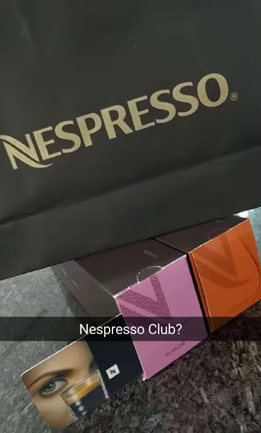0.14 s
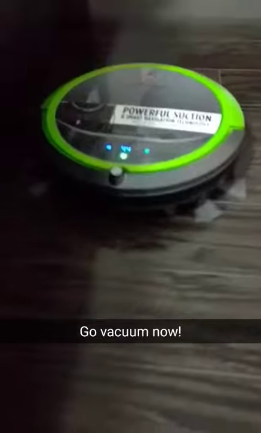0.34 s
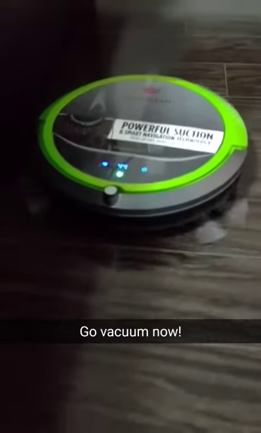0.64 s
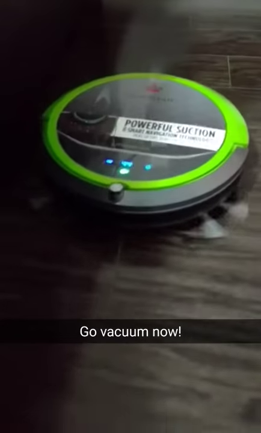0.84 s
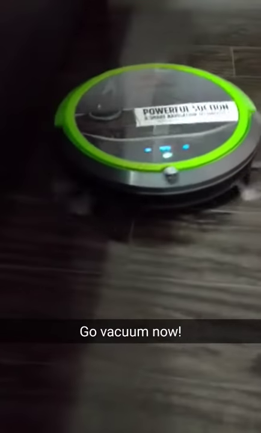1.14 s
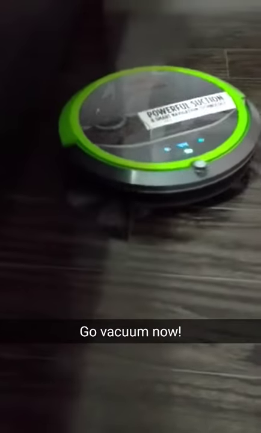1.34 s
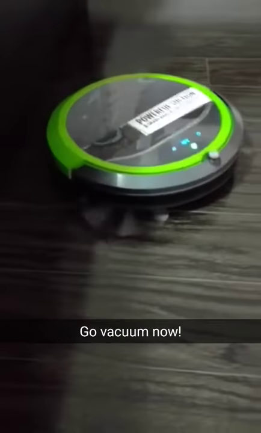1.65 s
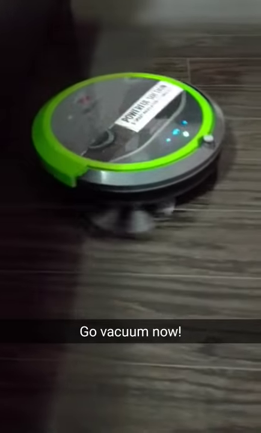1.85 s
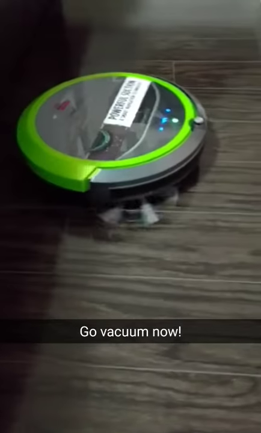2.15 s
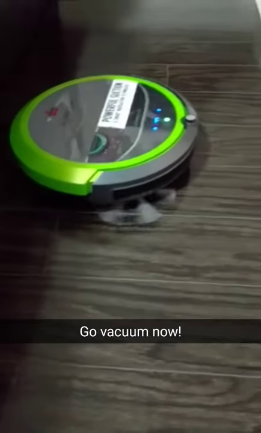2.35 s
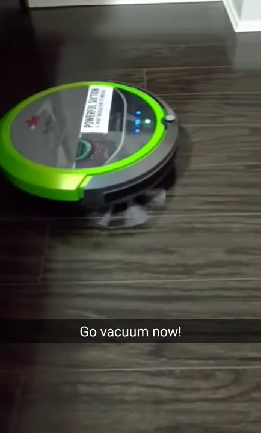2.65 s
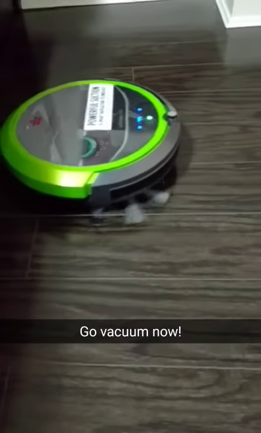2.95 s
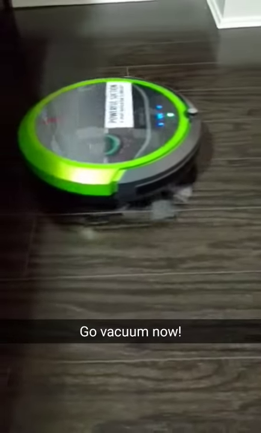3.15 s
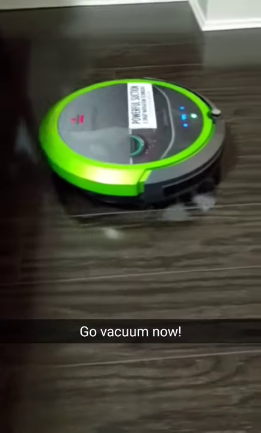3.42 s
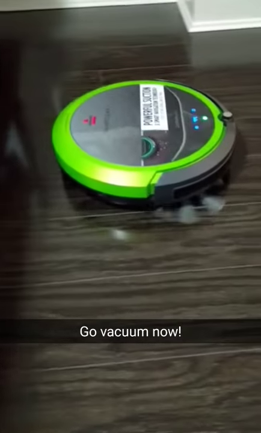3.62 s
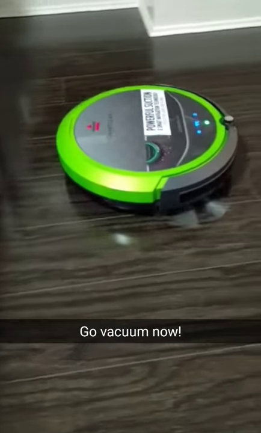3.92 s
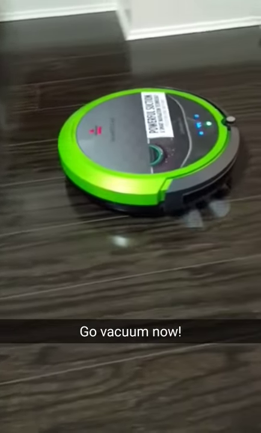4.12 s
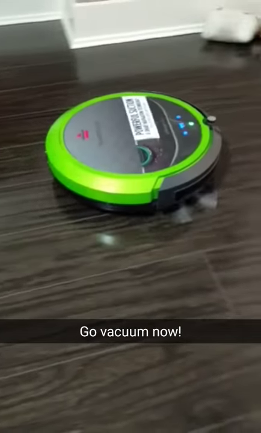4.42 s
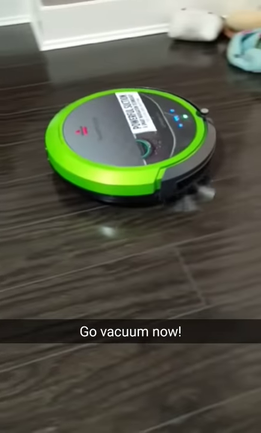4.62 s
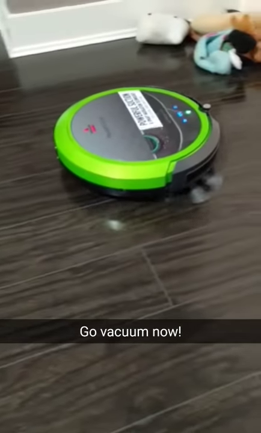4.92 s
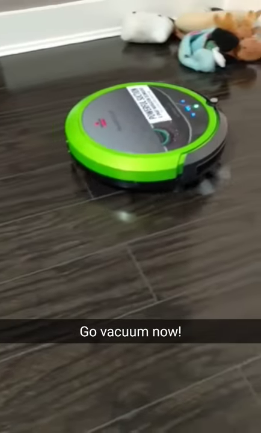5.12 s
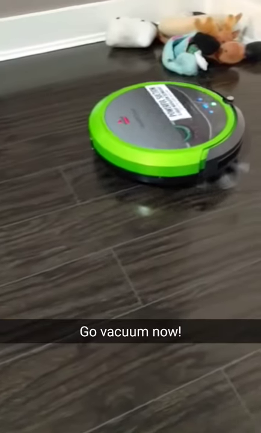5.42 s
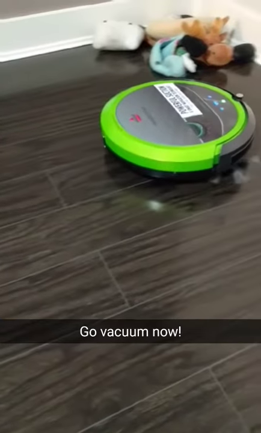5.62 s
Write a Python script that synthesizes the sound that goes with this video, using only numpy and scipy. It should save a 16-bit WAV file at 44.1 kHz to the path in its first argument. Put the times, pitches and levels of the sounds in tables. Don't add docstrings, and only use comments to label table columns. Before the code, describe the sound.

A robot cleaner turns on the spot and then drives across a wooden floor indoors. After a silent start, constant rushing air dominates, with wavering motor whine, brush-drive hum and airy whistling underneath, plus fine bristle flicks. Later, gentle rumbling and a low motor hum join as it moves off, only slightly quieter. Nearly mono phone pickup, with coarse, swirly treble.

```python
import sys
import numpy as np
from scipy import signal
from scipy.fft import rfft, irfft, dct
from scipy.io import wavfile
from scipy.ndimage import uniform_filter1d

SR = 44100
rng = np.random.default_rng(int(sys.argv[2]) if len(sys.argv) > 2 else 0)


def elevation(decibels):
    levels = np.asarray(decibels, float)
    return 10 ** (levels / 20)


def persist_wave(psi):
    counts = np.round(np.clip(psi, -1, 1) * 32767).astype(np.int16)
    wavfile.write(sys.argv[1], SR, np.atleast_2d(counts).T)


N = 254456
ROLLS_S, WHEELS_S = 3.1, 3.65
TOP_HZ = 14000


def rms_one(x):
    return x / np.sqrt(np.mean(x ** 2) + 1e-20)


def in_time(rows):
    s, *columns = np.transpose(rows)
    return [np.interp(np.arange(N) / SR, s, c) for c in columns]


def at_hz(points, hz):
    point_hz, value = np.transpose(points)
    return np.interp(np.log(hz), np.log(point_hz), value)


def drift(rate):
    r = np.exp(-80 * np.pi * rate / SR)
    slow = signal.lfilter([1], [1, -2 * r, r * r], rng.standard_normal(N // 40 + 2002))[2000:]
    return np.interp(np.arange(N) / 40, np.arange(len(slow)), rms_one(slow))


def band(x, low_hz, high_hz):
    return signal.sosfilt(signal.butter(2, [low_hz, high_hz], "band", fs=SR, output="sos"), x)


def coloured(colour):
    hz = np.arange(N // 2 + 1) * SR / N + 1
    return rms_one(irfft(rfft(rng.standard_normal(N)) * elevation(at_hz(colour, hz)), N))


def ramp(start_s, length_s):
    return np.clip((np.arange(N) / SR - start_s) / length_s, 0, 1)


def swell(rest_db, rows):
    t = np.arange(N // 64 + 2) * 64 / SR
    gain = elevation(rest_db)
    for s, length, db in rows:
        fall_db = 6 * (2 * (t - s) / length) ** 2
        gain = gain + elevation(db - np.minimum(fall_db, 90))
    return np.interp(np.arange(N) / SR, t, 20 * np.log10(gain))


def swells(rests_db, tables):
    return [swell(db, rows) for db, rows in zip(rests_db, tables)]


def turns(hz, wobble_hz):
    return 2 * np.pi * np.cumsum(hz + wobble_hz * drift(5.1)) / SR


def lines(phase, orders, levels_db, flutter_db):
    out = 0
    for k, db in zip(orders, levels_db):
        gain = np.sqrt(2) * elevation(db + flutter_db * drift(9.3))
        out = out + gain * np.sin(k * phase + rng.uniform(0, 2 * np.pi))
    return out


def whistle(hz, level_db, width_hz):
    phase = 2 * np.pi * np.cumsum(hz) / SR
    return elevation(level_db) * (drift(width_hz) * np.cos(phase) + drift(width_hz) * np.sin(phase))


# f/Hz, level/dB per Hz
ROOM_TONE = [(12, -22), (20, -8), (30, -12), (75, -8), (105, -11), (130, -4), (170, -36), (300, -90)]


def room_tone():
    return elevation(-64.5) * coloured(ROOM_TONE)


# t/s, level/dB
AIR = [
    (.4, -28),
    (.87, -26),
    (1.15, -27),
    (2.4, -28),
    (3.3, -27.5),
    (4.5, -28),
    (5.77, -28.5),
]
# f/Hz, level/dB per Hz
AIR_COLOUR = [(100, -45), (170, -16), (241, -14.5), (461, -4.5), (787, -2.5), (879, -2.5), (1560, -1.5),
              (1740, -2), (2710, -1.5), (3200, -1), (3990, -3.5), (4890, -2.5), (13000, -4), (14000, -5.5)]
# f/Hz, width/Hz, level/dB
SHELL = [(476, 21, 3), (883, 75, 2), (950, 35, -1.5), (2190, 85, 0.5), (2786, 150, -1), (4070, 330, -1),
         (274, 28, 1), (366, 27, 1), (3160, 140, 0.5), (5850, 670, 1), (9800, 650, 2.5), (13200, 830, 3.5)]


def air(gear_phase):
    level_db, = in_time(AIR)
    facing_db = ramp(ROLLS_S, 0.43) - .5
    rolling = ramp(4.0, 1.2)
    edges = 160 * 2 ** (np.arange(41) / 6)
    white, gust = rng.standard_normal((2, N)), drift(8.3)
    near, out = drift(12), 0
    throb = np.sin(gear_phase / 10) + 0.45 * np.sin(gear_phase / 5)
    for k, (low, high) in enumerate(zip(edges, edges[1:])):
        hz = np.sqrt(low * high)
        near = 0.69 * near + 0.77 * drift(18.0)
        db = at_hz(AIR_COLOUR, hz) + facing_db * (1200 < hz < 3000)
        db = db - 2.3 * rolling * (hz < 330)
        db = db + .4 * gust + .7 * near + .9 * drift(25)
        db = db + at_hz([(2000, 0.057), (12000, 0.74)], hz) * throb
        out = out + elevation(db) * band(white[k % 2], low, high)
    hz = np.arange(N // 2 + 1) * SR / N
    shape = sum(db / (1 + (2 * (hz - centre) / width) ** 2) for centre, width, db in SHELL)
    out = irfft(rfft(out) * elevation(shape), N)
    return elevation(level_db) * out / np.std(band(out, 3000, 8000))


def dust_bin():
    cavity_db = in_time(AIR)[0] - 23 - 8 * ramp(WHEELS_S, 0.25)
    cavity = whistle(468 + 4 * drift(0.93), cavity_db, width_hz=10)
    outlet = whistle(np.full(N, 555.), swell(-66.5, [(1.1, .8, -46)]), width_hz=20)
    return cavity + outlet


GEAR_ORDERS = (1, 2, 3, 4, 5, 6, 8)
GEAR_REST_DB = [-69, -64, -55, -56, -62.5, -61.5, -68]
# t/s (centre), length/s, level/dB (peak)
GEAR_SWELLS = [
    [(3.3, 1.0, -58), (5.0, 1.2, -53)],
    [(.75, 0.64, -47.5), (1.8, 1.9, -48), (3.95, 0.48, -46.5), (5.25, 1.1, -45)],
    [(.78, 0.4, -45), (2.5, 0.17, -47.5), (3.25, 1.0, -42), (4.95, 0.67, -46)],
    [(1.4, 0.54, -42.5), (2.5, 1.4, -45), (3.8, 0.51, -48.5), (5.35, 0.29, -52)],
    [(2.05, .5, -41), (3.8, 0.87, -45), (5.35, .4, -40.5)],
    [(.8, .2, -46), (3.5, 0.2, -44), (4.3, 0.76, -47), (5.2, 0.28, -50)],
    [(1.75, 0.43, -42), (3.3, 0.97, -54), (5.4, .5, -48)],
]


def brush_gears(gear_phase):
    return lines(gear_phase, GEAR_ORDERS, swells(GEAR_REST_DB, GEAR_SWELLS), flutter_db=1.3)


BRUSH_ORDERS = (2, 3, 4, 18)
BRUSH_REST_DB = [-70, -69.5, -63.5, -61]
# t/s (centre), length/s, level/dB (peak)
BRUSH_SWELLS = [
    [(1.0, 1.12, -52.5), (2.6, 1.6, -50), (4.05, 0.29, -52)],
    [(1.0, 0.26, -58), (1.85, 0.16, -57.5), (3.2, 1.45, -58.5), (4.5, 0.67, -62)],
    [(4.5, 0.55, -61)],
    [(.8, 0.61, -42), (2.7, 0.97, -48.5), (4.35, 0.46, -44), (5.0, .3, -52)],
]


def brush_shaft(gear_phase):
    return lines(gear_phase / 5, BRUSH_ORDERS, swells(BRUSH_REST_DB, BRUSH_SWELLS), flutter_db=.4)


# t/s, f/Hz
FAN = [
    (.4, 856),
    (1.0, 857.5),
    (2.9, 857.5),
    (3.2, 854.3),
    (5.77, 854.0),
]
FAN_ORDERS = (1, 2, 3, 9 / 4)
FAN_REST_DB = [-70.5, -51.5, -57, -60]
# t/s (centre), length/s, level/dB (peak)
FAN_SWELLS = [
    [(.75, 0.23, -59), (1.6, 0.82, -48.5)],
    [(1.03, 0.67, -40), (1.55, .16, -43.5), (2.12, 0.26, -42), (3.55, 0.67, -39), (4.0, .3, -43.5),
     (4.72, .4, -34), (5.08, 0.41, -45), (5.75, 0.22, -45)],
    [(.9, 0.5, -48), (1.55, 0.35, -41), (2.8, .4, -54), (3.9, .3, -53), (5.3, 0.6, -40.5)],
    [(1.3, 1.09, -56), (3.4, 0.27, -44), (4.1, 0.37, -52), (5.0, .9, -50)],
]


def suction_fan():
    blade_hz, = in_time(FAN)
    levels_db = swells(FAN_REST_DB, FAN_SWELLS)
    blades = lines(turns(blade_hz, wobble_hz=.8), FAN_ORDERS, levels_db, flutter_db=1.0)
    wake = whistle(2 * blade_hz, levels_db[1] - 7, width_hz=25)
    return blades + wake


# t/s, f/Hz (low whistle), f/Hz (high whistle)
WHISTLES = [
    (.4, 874, 2294),
    (1.9, 856, 2210),
    (2.2, 926, 2180),
    (3.2, 958, 2090),
    (3.6, 940, 2150),
    (3.95, 923, 2180),
    (4.2, 946, 2087),
    (4.75, 976, 2145),
    (5.77, 976, 2174),
]
WHISTLE_REST_DB = [-53.5, -55.5]
# t/s (centre), length/s, level/dB (peak)
WHISTLE_SWELLS = [
    [(1.25, 0.62, -44), (2.3, 0.33, -44), (2.9, 0.57, -42), (4.1, 0.54, -40.5), (4.7, 0.37, -42.5),
     (5.6, 0.51, -48)],
    [(.9, 0.95, -51), (3.3, 0.21, -39.5), (4.05, 0.38, -37), (4.75, .3, -41), (5.7, .2, -38)],
]


def gap_whistles():
    low_hz, high_hz = in_time(WHISTLES)
    low_db, high_db = swells(WHISTLE_REST_DB, WHISTLE_SWELLS)
    return whistle(low_hz, low_db, width_hz=35) + whistle(high_hz, high_db, width_hz=70)


# t/s (centre), length/s, level/dB (peak)
BRISTLE_SWELLS = [
    (.86, .2, -47),
]


def bristles():
    sizes = elevation(4.5 * np.minimum(rng.exponential(1, N), 3)) * rng.choice([-1, 1], N)
    ticks = sizes * (rng.random(N) < 250 * elevation(3.0 * drift(8)) / SR)
    ring = signal.lfilter([1], [1, -np.exp(-1 / (0.0009 * SR))], np.abs(ticks))
    tail = ring * rng.standard_normal(N)
    level_db = swell(-37.5, BRISTLE_SWELLS)
    return elevation(level_db) * rms_one(band(ticks + 0.45 * tail, 1460, 8300))


# f/Hz, level/dB per Hz
RUMBLE_COLOUR = [(13, -50), (22, -28), (73, -4.5), (92, -1), (113, -18), (130, 5), (170, -20), (290, -120)]
# t/s (centre), length/s, level/dB (peak)
RUMBLE_BUMPS = [
    (.64, 0.17, -50),
    (3.75, 0.25, -58),
    (4.7, 0.32, -53),
    (4.98, .1, -55),
    (5.5, 0.61, -57),
]


def floor_rumble():
    standing = elevation(swell(-69, RUMBLE_BUMPS))
    rolling = elevation(-59) * ramp(ROLLS_S, .12)
    return (standing + rolling) * elevation(.8 * drift(6.1)) * coloured(RUMBLE_COLOUR)


def drumming_boards():
    return ramp(ROLLS_S, .12) * whistle(np.full(N, 86.), -61.5, width_hz=14)


# t/s, f/Hz
WHEELS = [
    (3.7, 146),
    (4.08, 153),
    (4.4, 161.3),
    (4.8, 160),
    (5.08, 145.9),
    (5.5, 150),
    (5.77, 151.3),
]
WHEEL_REST_DB = [-56, -59]
# t/s (centre), length/s, level/dB (peak)
WHEEL_SWELLS = [
    [(4.53, 0.91, -50)],
    [(5.22, 0.18, -47), (5.5, .25, -42)],
]


def wheel_motor():
    phase = turns(in_time(WHEELS)[0], wobble_hz=1.0)
    hum = lines(phase, (1, 3), swells(WHEEL_REST_DB, WHEEL_SWELLS), flutter_db=1.5)
    return ramp(WHEELS_S, 0.25) * hum


def scene():
    gear_phase = turns(357.0, wobble_hz=.25)
    mono = room_tone() + air(gear_phase) + dust_bin()
    mono += brush_gears(gear_phase) + brush_shaft(gear_phase)
    mono += suction_fan() + gap_whistles() + bristles()
    mono += floor_rumble() + drumming_boards() + wheel_motor()
    return np.array([mono, mono]) * ramp(0.38, 0.29)


# f/Hz, level/dB (step over the local level)
COARSENESS = [(150, -40), (450, -16), (1400, -8), (2000, 0), (2350, 4), (2750, 5.8), (3300, 5.8), (4000, 7),
              (4600, 5), (5200, 0.7), (8000, 1.8), (9500, 0), (11400, 2.5), (12900, 0), (13700, 6)]


def phone_rounding(x, size, spread_db, coarser_db):
    window = signal.windows.kaiser_bessel_derived(2 * size, 4 * np.pi)
    padded = np.pad(x, (size, 2 * size - N % size))
    frames = np.lib.stride_tricks.sliding_window_view(padded, 2 * size)[::size] * window
    a, b, c, d = np.split(frames, 4, axis=1)
    bins = dct(np.hstack([-c[:, ::-1] - d, a - b[:, ::-1]]), type=4, norm="ortho")
    hz = (np.arange(size) + .5) * SR / (2 * size)
    local = uniform_filter1d(bins ** 2, size=size // 8, axis=1)
    local = uniform_filter1d(local, size=5120 // size, axis=0)
    width, hold = (8, 1) if size > 512 else (4, 4)
    luck = rng.standard_normal((len(bins) // hold + 2, size // width + 1))
    luck = rms_one(luck[1:, 1:] + .25 * luck[:-1, 1:] + .6 * luck[1:, :-1] + .4 * luck[1:, :1])
    luck = np.repeat(np.repeat(luck, width, axis=1), hold, axis=0)[:len(bins)]
    luck -= np.clip((.62 - np.arange(len(bins)) * size / SR) * 20, 0, 2)[:, None]
    luck[int(.7 * SR / size):int(1.95 * SR / size)] += 1.2 * (np.abs(hz - 2750) < 110)
    luck[int(4.9 * SR / size):] -= .35
    step = np.sqrt(local.clip(1e-16)) * elevation(at_hz(COARSENESS, hz) + coarser_db + spread_db * luck)
    bins = np.sign(bins) * np.floor(np.abs(bins) / step + .4054) * step * (hz < TOP_HZ)
    p, q = np.split(dct(bins, type=4, norm="ortho"), 2, axis=1)
    frames = np.hstack([q, -q[:, ::-1], -p[:, ::-1], -p]) * window
    early, late = np.split(frames, 2, axis=1)
    return (early[1:] + late[:-1]).ravel()[:N]


# t/s, f/Hz (low), f/Hz (high), level/dB
SPLIT_FRAMES = [(1.134, 4650, 5850, -35), (1.53, 4230, 5300, -42), (1.53, 5650, 7050, -38),
                (1.53, 10300, 12500, -33), (2.41, 8200, 9700, -37), (2.48, 5650, 7050, -37),
                (2.48, 11650, 13200, -35), (2.875, 7550, 9700, -35), (2.945, 6250, 7750, -33),
                (4.08, 5650, 7710, -33), (5.08, 4650, 5870, -36), (5.525, 6250, 11200, -31)]


def split_flecks():
    t, side = np.arange(N) / SR, np.zeros(N)
    hz = np.arange(N // 2 + 1) * SR / N
    for s, low_hz, high_hz, db in SPLIT_FRAMES:
        noise = irfft(rfft(rng.standard_normal(N)) * (hz > low_hz) * (hz < high_hz), N)
        side += elevation(db) * rms_one(noise) * np.cos(np.pi * np.clip((t - s) / 0.035, -.5, .5))
    return side


def roll_off(x):
    return signal.sosfilt(signal.butter(12, 15230, fs=SR, output="sos"), x)


def record(dry):
    short = np.repeat(rng.random(N // 1024 + 1) < .035, 1024)[:N] * 1.
    short = uniform_filter1d(short, size=128)
    long_frames = phone_rounding(dry[0], size=1024, spread_db=3.7, coarser_db=.5)
    short_frames = phone_rounding(dry[0], size=128, spread_db=3.5, coarser_db=-1)
    mono = long_frames + short * (short_frames - long_frames)
    low_pass = signal.cheby2(14, 40, TOP_HZ + 450, fs=SR, output="sos")
    mono = signal.sosfiltfilt(low_pass, mono - .0004)
    mono = mono * ramp(.4005, .001)
    return roll_off(mono + split_flecks() * [[1], [-1]])


dry = scene()
out = record(dry)
persist_wave(out)
```